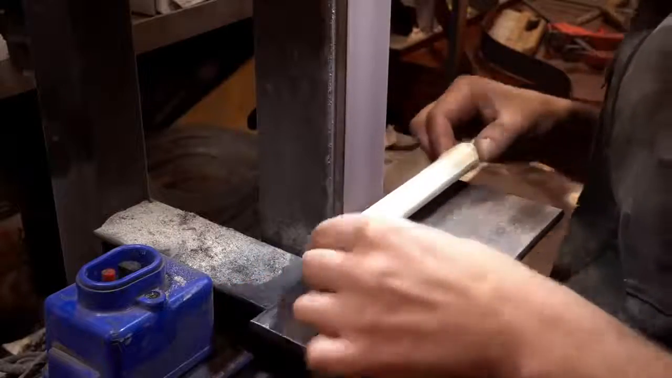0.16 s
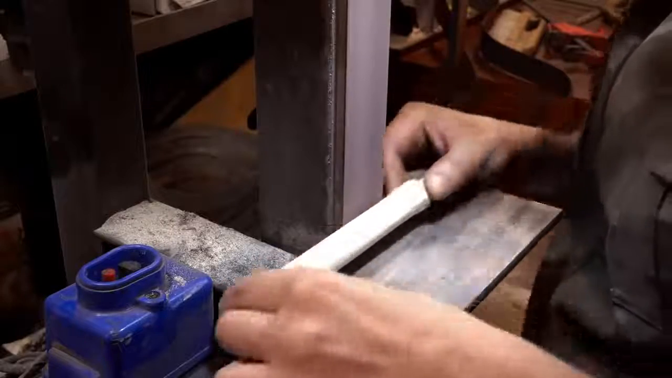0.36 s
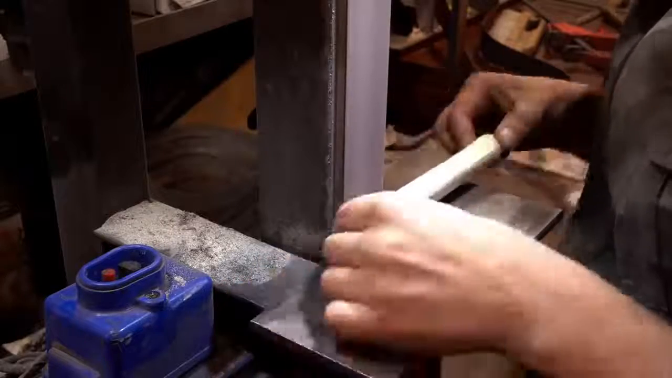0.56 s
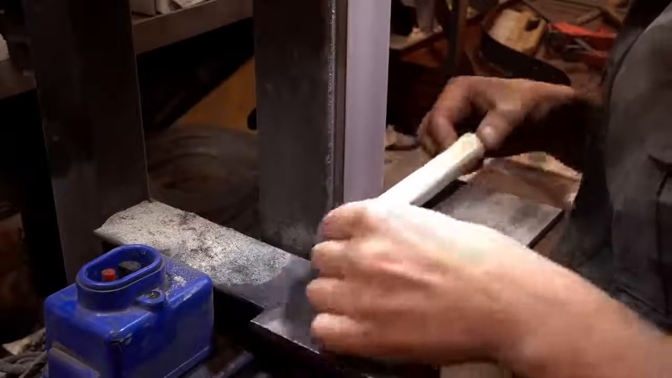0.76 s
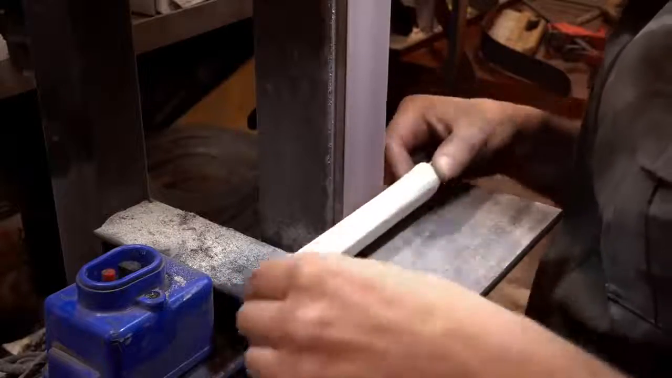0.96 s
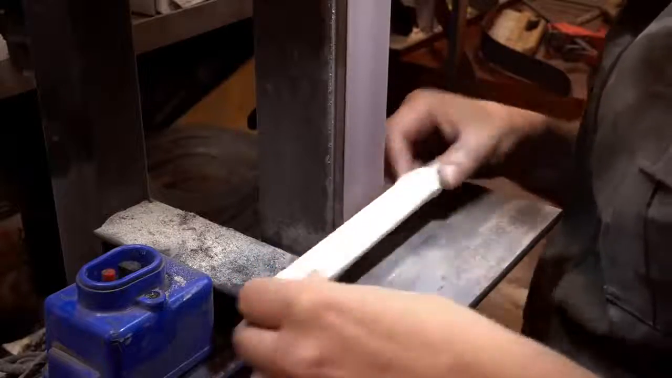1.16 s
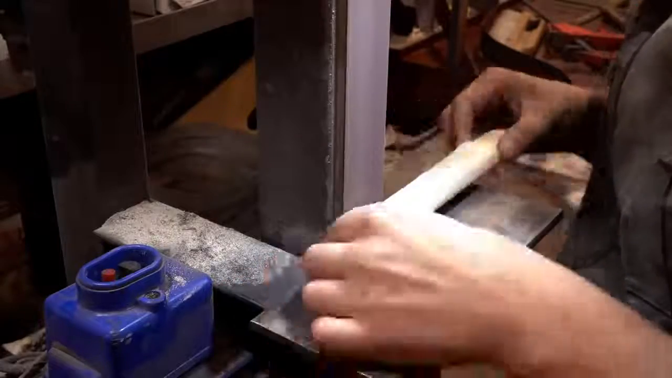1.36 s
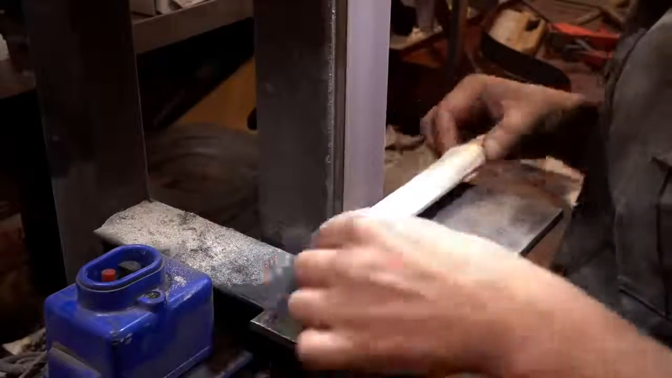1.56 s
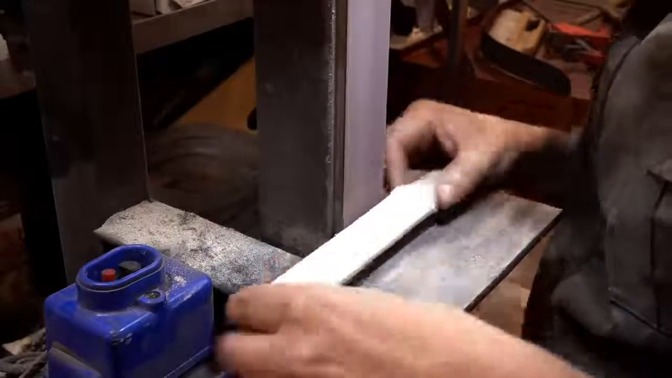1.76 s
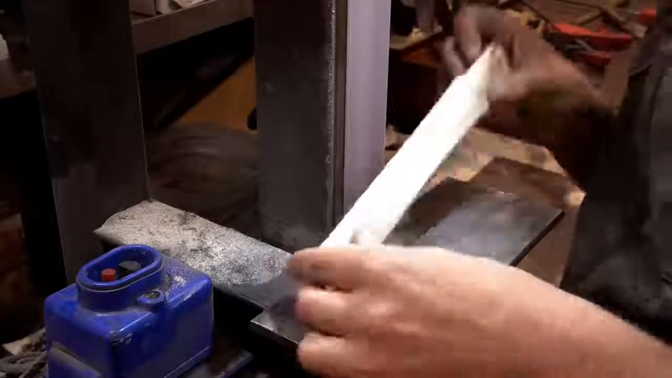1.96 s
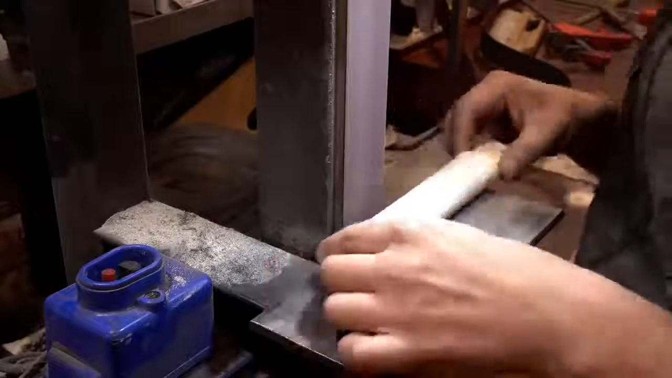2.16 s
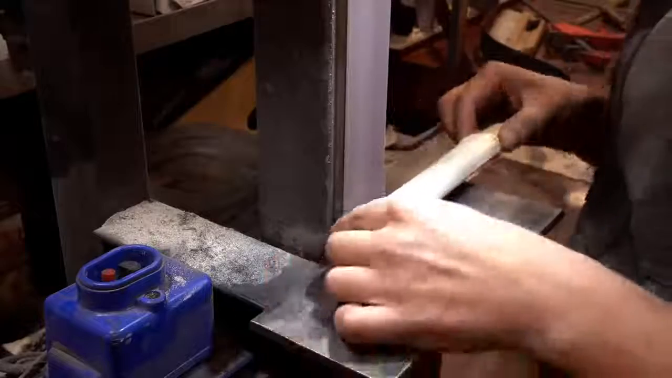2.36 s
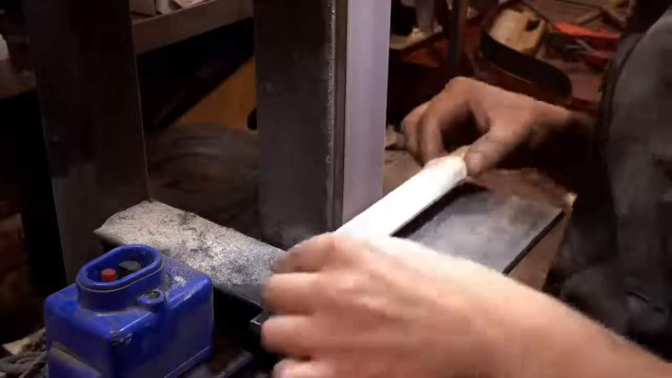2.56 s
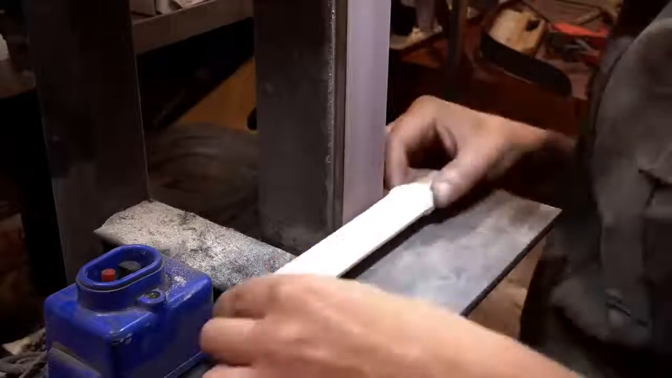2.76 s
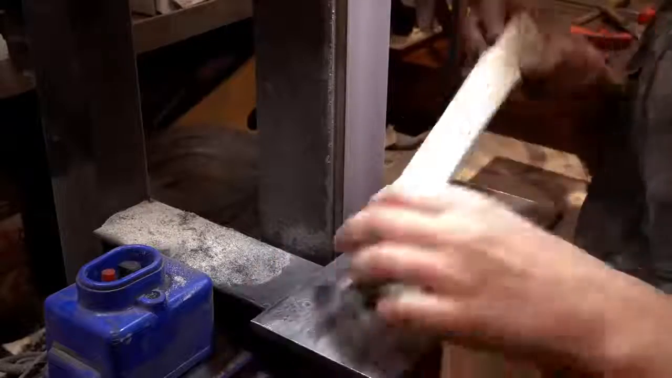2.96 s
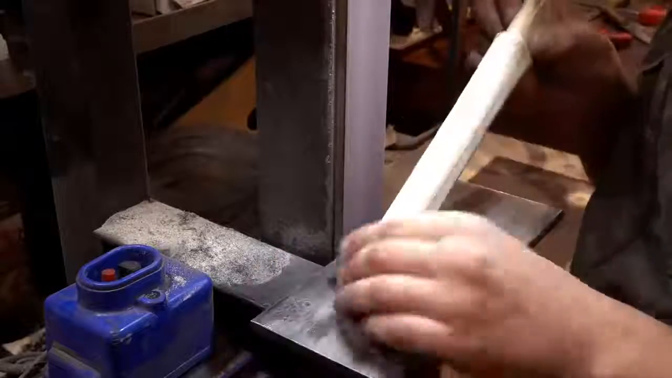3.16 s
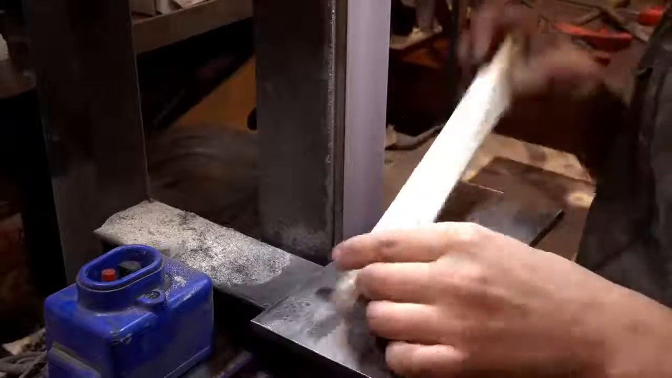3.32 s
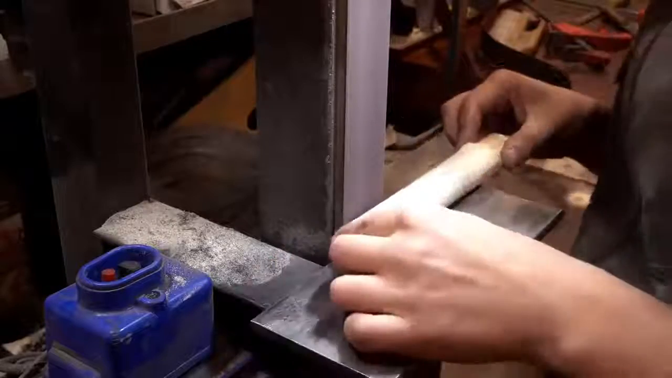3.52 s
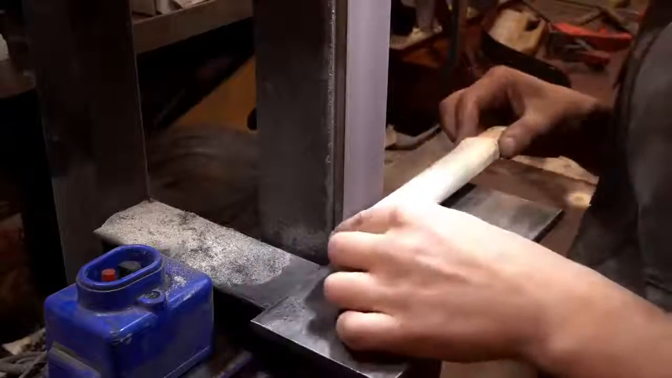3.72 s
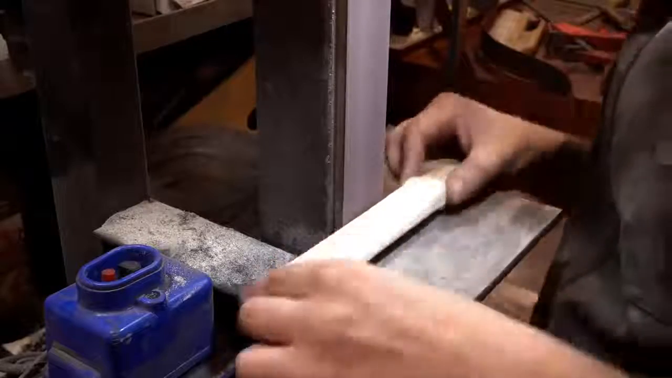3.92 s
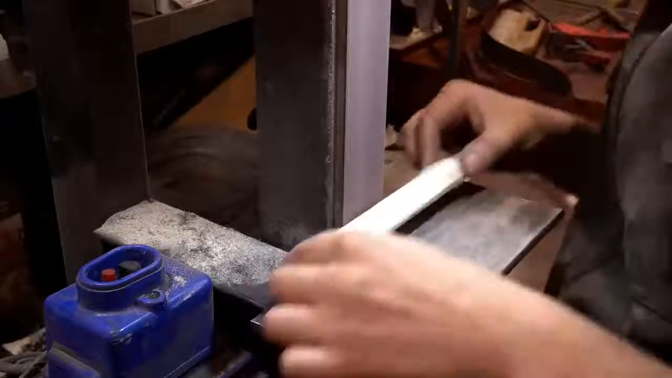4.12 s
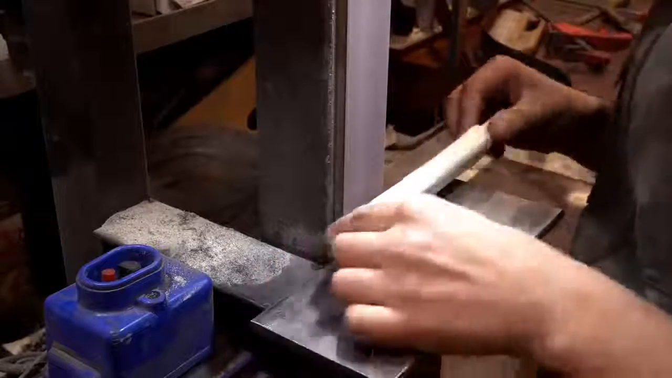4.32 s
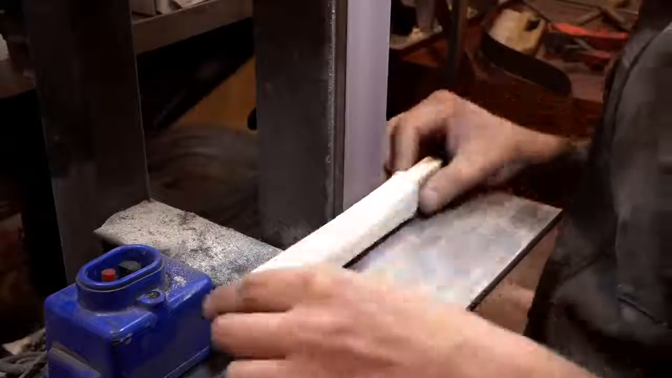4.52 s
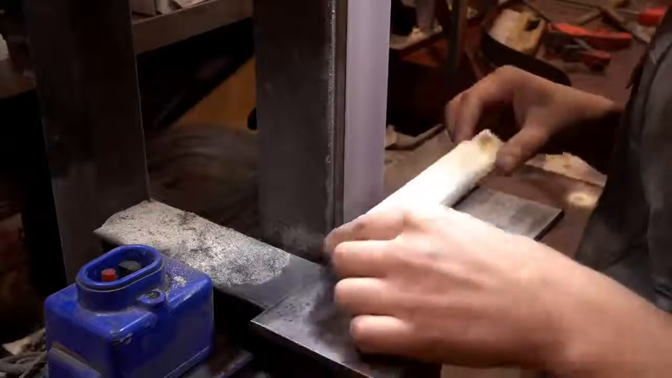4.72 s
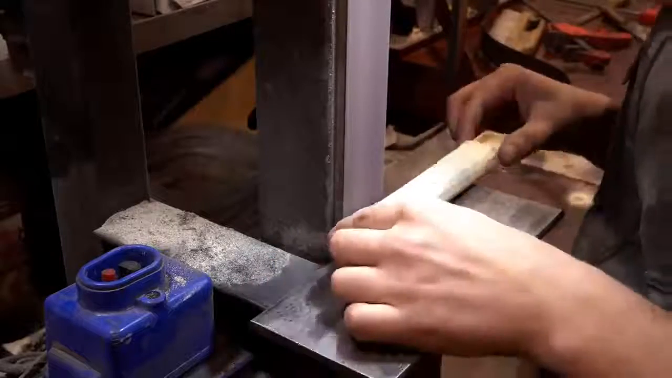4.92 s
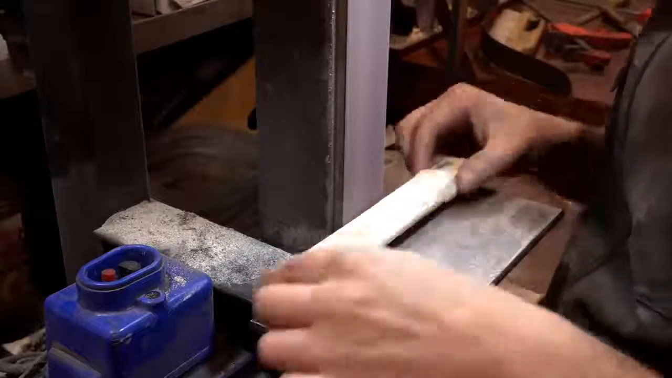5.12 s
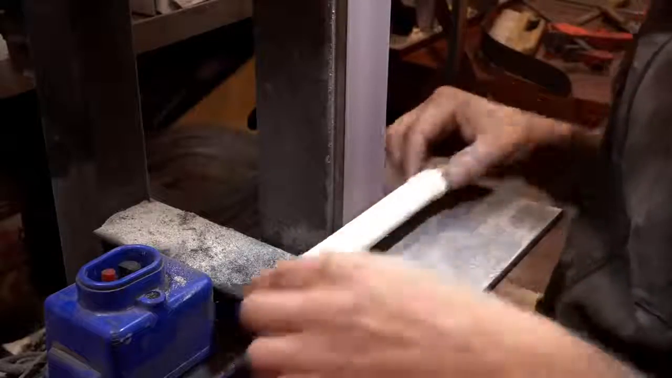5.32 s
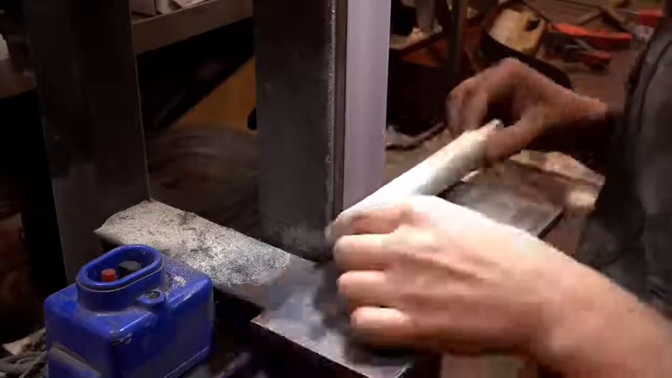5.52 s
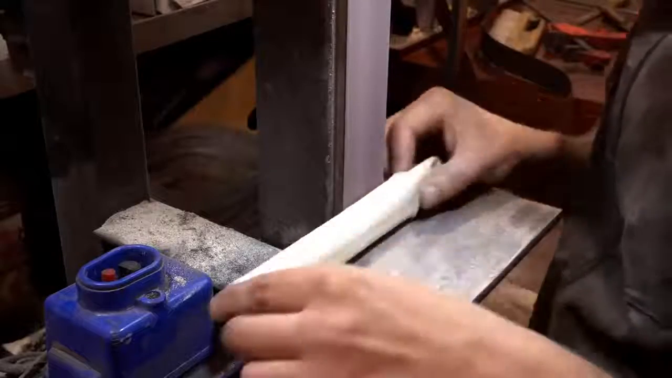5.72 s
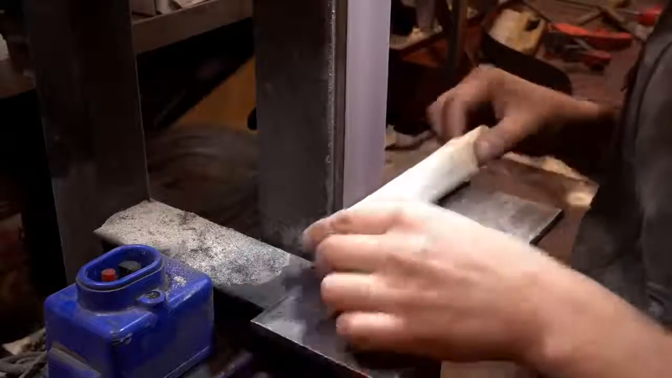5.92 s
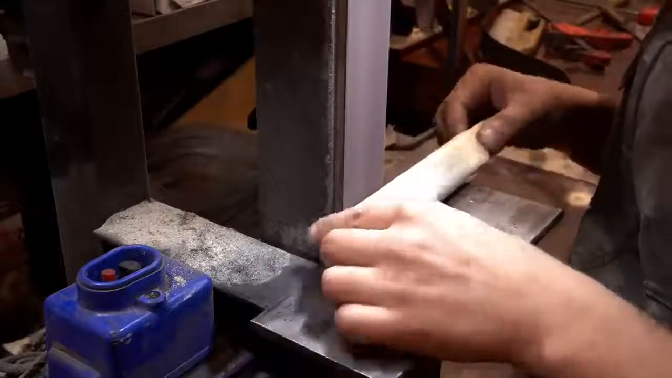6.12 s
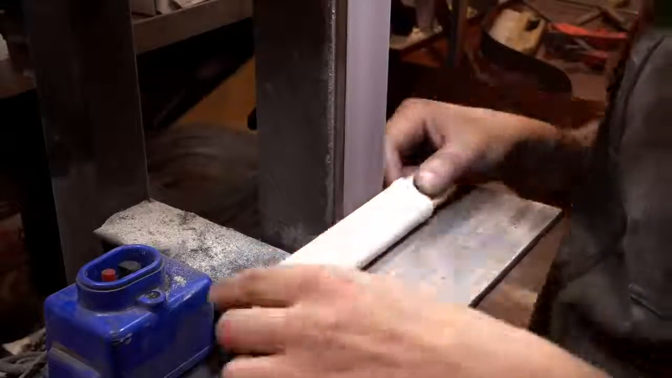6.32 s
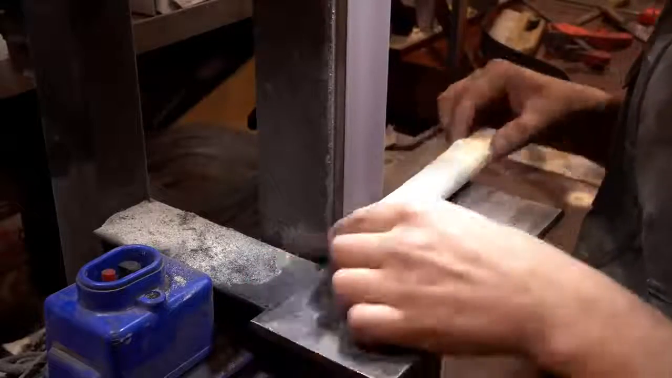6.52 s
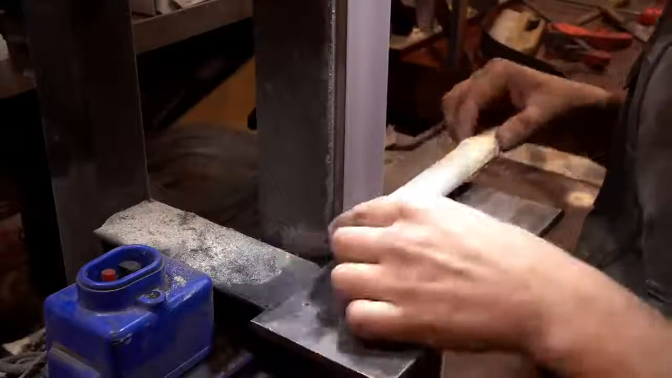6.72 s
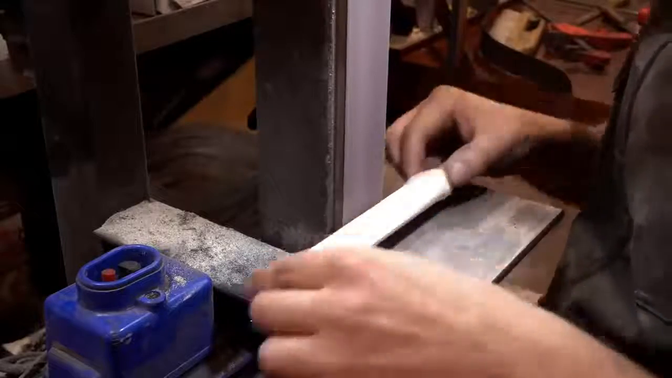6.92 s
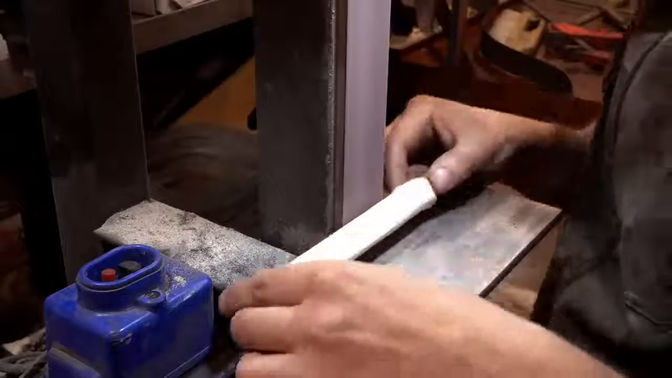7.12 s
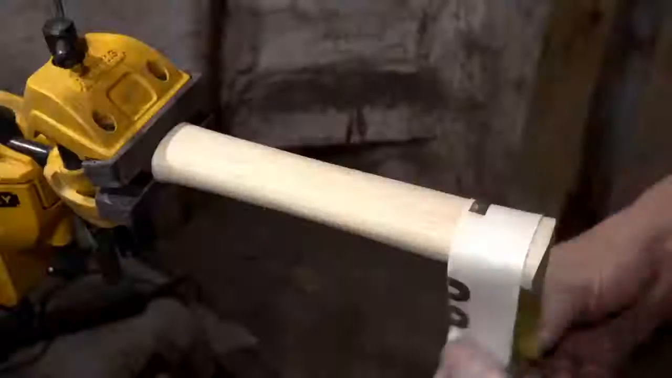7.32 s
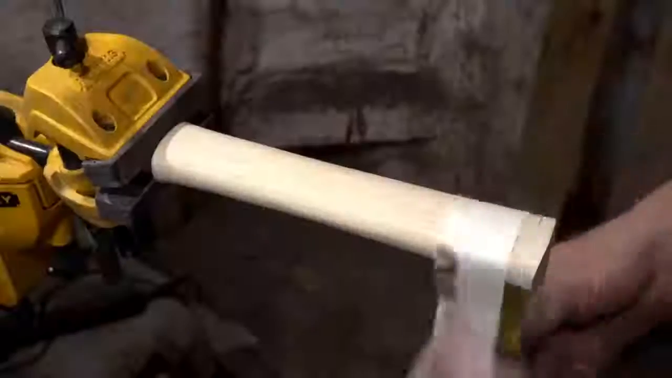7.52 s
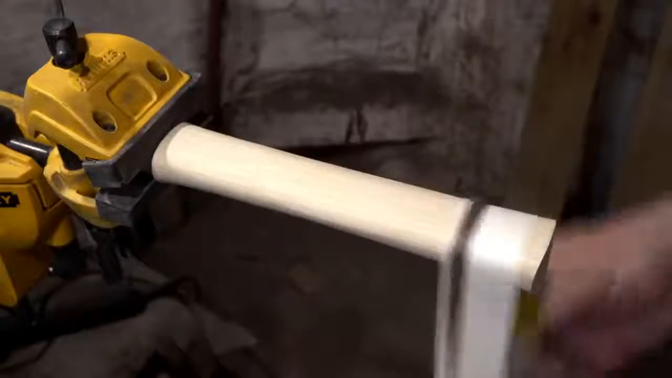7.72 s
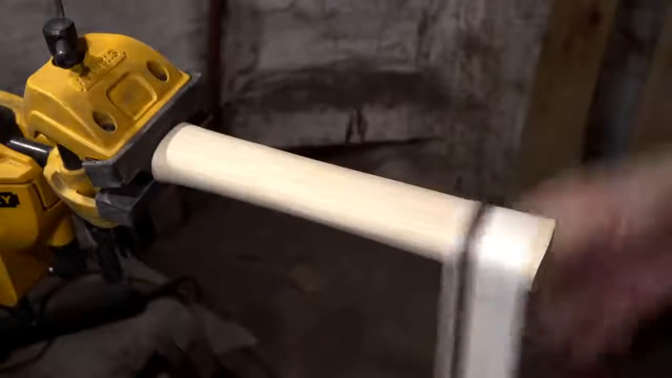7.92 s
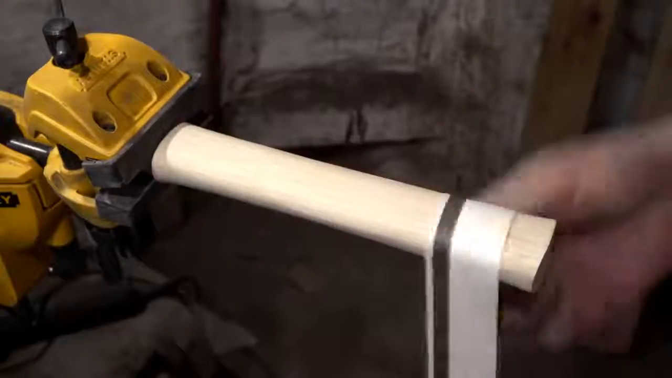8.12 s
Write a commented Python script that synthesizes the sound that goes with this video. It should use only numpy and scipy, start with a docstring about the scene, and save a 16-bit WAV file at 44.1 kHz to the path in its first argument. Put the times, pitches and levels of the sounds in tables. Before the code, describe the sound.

A belt grinder hums and rushes steadily while a wooden handle is sanded in hissing, ringing passes, then fast back-and-forth hand-sanding swishes take over.

```python
"""A workshop: a belt grinder idles while a wooden handle is pressed on the belt in short passes.
Shaped noise is the grit, hissing and ringing the steel plate behind the belt; over it lie the belt's rush
and three motor hums. Then a quick crossfade leads to hand sanding: a strip of sandpaper is pulled quickly
to and fro over the handle, one swish of noise a stroke, with faint low noise under the swishes."""
import sys
import numpy as np
from scipy import signal
from scipy.fft import rfft, irfft, next_fast_len
from scipy.io import wavfile
from scipy.ndimage import uniform_filter1d

SR = 44100
rng = np.random.default_rng(int(sys.argv[2]) if len(sys.argv) > 2 else 0)


def bounce(signal):
    """Save signal as a 16-bit WAV file at the path given by the first command-line argument."""
    frames = np.transpose(np.atleast_2d(signal))
    limited = np.clip(frames, -1, 1)
    pcm = np.round(limited * 32767).astype(np.int16)
    wavfile.write(sys.argv[1], SR, pcm)


N = 360723
FFT_N = next_fast_len(N)
T = np.arange(N) / SR  # time of each sample (s)
HZ = np.arange(FFT_N // 2 + 1) * SR / FFT_N  # frequency of each spectrum bin
CROSSFADE_S, FADE_S = 7.336, 0.0086  # moment of the crossfade; length of both fades


def sanding():
    """Grit tears wood and rings the plate; pressure and the face of the handle set each range of the hiss."""
    # handle on the belt, one list a pass from touch-down to lift-off:
    # (time [s], level of the grit hiss [dB], plate ring re hiss [dB], finest grit re hiss [dB])
    passes = [
        [(0.0, -55, -2, 5), (0.124, -57.5, 0.5, 2), (0.134, -59.5, -2, -2), (0.244, -51, -6.5, 3.5),
         (0.51, -53, -2, -1), (0.556, -59, -0.5, -3), (0.56, -74, 2, 4)],
        [(0.79, -57.5, -10, -1.5), (0.86, -48.5, -2.5, 0.67), (0.944, -51, -2, 0.59), (0.956, -53, -1, 1),
         (1.046, -52.5, -5, 1), (1.228, -55.5, -2.5, -1.7), (1.27, -61.5, -5, -1)],
        [(1.6, -59, -6, 3), (1.626, -50.5, -4, 4), (1.676, -52, 1.5, 1), (1.876, -55, 3.5, 1),
         (1.89, -62, -2, -4)],
        [(2.41, -61.5, -2, 7), (2.49, -57, 0.5, 3), (2.556, -52, -5, 2), (2.64, -54, 1, 4),
         (2.682, -50, -10, 0), (2.734, -53.5, -1, 4), (2.834, -55, 3, 2), (2.96, -55, 3, 4), (2.975, -65, 4, 9)],
        [(3.69, -68, -1, 8), (3.694, -58.5, -6, 1), (3.904, -50.5, -5.5, 3), (3.998, -54, 0, 3),
         (4.098, -54.5, -3, 6.5), (4.272, -50.5, -5, 1.5), (4.354, -61.5, 1.5, 3), (4.472, -50, -6, -1),
         (4.61, -53.5, -5, 0), (4.644, -48, -8, 0), (4.734, -49, -12, 0), (4.765, -58, -14, 2)],
        [(5.04, -63, -12, 4), (5.092, -51.5, -4, 4), (5.162, -51.5, -3, 4), (5.222, -52.5, -2.5, 2),
         (5.446, -51.5, 0, 3), (5.564, -60, -3, -1), (5.776, -49.5, -6, 3.5), (5.812, -54.5, -15, 4),
         (5.86, -50.5, -6, 0), (5.894, -46, -10, 0), (5.922, -51, -5.5, -1), (6.1, -54, -6.5, -1),
         (6.178, -55.5, -20, -1), (6.276, -52, -12, -2), (6.36, -51, -10, 3), (6.446, -50.5, -24, 4),
         (6.5, -57.5, -7, -1)],
        [(6.68, -64, -1, 4), (6.726, -52.5, -9, -3), (6.776, -57, -5, 0), (6.846, -51.5, 0, -2),
         (6.916, -52, -0.5, 1), (7.27, -54, 1.5, 3), (7.33, -56.5, 0, 2)],
    ]
    # low ranges of the sanding, in lists: (time [s], level of the wood rasp [dB], level of the lower plate ring [dB])
    lows = [
        [(0.0, -62, -64), (0.18, -66, -56.5), (0.28, -64, -66), (0.344, -62, -61), (0.452, -64.5, -62),
         (0.522, -62.5, -60), (0.55, -67, -63), (0.56, -75, -70)],
        [(0.79, -67, -58), (0.81, -82, -63), (0.816, -68, -60), (0.834, -68, -53), (1.048, -63, -61.5),
         (1.184, -62.5, -62.5), (1.23, -60.5, -60), (1.27, -67, -71)],
        [(1.6, -78, -63), (1.626, -65, -56), (1.638, -74, -57), (1.642, -67, -52), (1.736, -63.5, -60),
         (1.868, -64, -56.5), (1.89, -70, -65)],
        [(2.41, -70, -71), (2.496, -67, -54.5), (2.554, -66.5, -53.5), (2.734, -61.5, -57.5), (2.812, -70, -57),
         (2.864, -62.5, -59), (2.96, -69, -61), (2.97, -71, -74)],
        [(3.69, -70, -69), (3.718, -71, -59), (3.824, -66, -56.5), (4.298, -64.5, -58.5), (4.374, -71, -62),
         (4.44, -65.5, -55), (4.73, -65, -55.5), (4.76, -68, -66)],
        [(5.04, -71, -65), (5.068, -69, -58.5), (5.15, -63.5, -53.5), (5.356, -64, -58.5), (5.42, -63.5, -52),
         (5.606, -70, -64), (5.622, -73, -60), (5.7, -65, -61)],
        [(5.72, -64, -54.5), (5.786, -62, -59), (5.832, -68, -66), (5.902, -63.5, -52.5), (6.206, -68.5, -57.5),
         (6.262, -68, -54.5), (6.418, -63.5, -54.5), (6.5, -66, -64)],
        [(6.68, -77, -64), (6.696, -67, -59), (6.752, -68, -57), (6.956, -65, -54.5), (6.974, -64, -62),
         (6.996, -65.5, -55.5), (7.284, -65, -59), (7.325, -64, -62)],
    ]
    # colour of the sanding noise: (frequency [Hz], level [dB per Hz])
    colour = [(600, -50), (900, -29.5), (1500, -10.5), (1700, -14.5), (1850, -8), (2700, -9), (2900, -6),
              (3220, -5.5), (3650, -8.5), (4400, -7), (5200, -7), (6500, -3.5), (9000, -3), (12000, 0),
              (14500, 5.5), (15700, 1)]
    # steel plate and rest under the handle: (frequency [Hz], width [Hz], level over the sanding noise [dB])
    plate = [(1044, 25, 14), (1324, 25, 5), (1841, 20, 5), (2067, 20, 2), (2250, 20, 4), (2583, 20, 3),
             (2906, 18, 6), (2960, 22, 3), (3143, 25, 6), (3249, 30, 4), (3320, 30, 4), (3433, 22, 2),
             (3740, 22, 5), (3897, 18, 4), (4166, 22, 6), (4242, 18, 9), (4382, 20, 6), (4620, 60, -1),
             (4931, 20, 6), (4984, 20, 3), (5717, 30, -2), (6223, 25, 0), (6589, 25, 0), (7224, 25, 1)]
    # width of the sound field: (frequency [Hz], side minus mid [dB])
    width = [(1000, -78), (2400, -24), (4400, -7.5), (8000, -7), (15000, -7.5)]
    # broad tones that swell and fade as the handle is turned:
    # (middle [s], length [s], pitch [Hz], level over the sanding noise [dB])
    tones = [(0.268, .1, 5600, -12), (0.304, 0.1, 4700, -9), (.36, 0.1, 2050, -3), (.52, 0.087, 3400, -3),
             (.88, 0.13, 14900, -3), (0.907, 0.18, 4830, -9), (1.147, .16, 6740, -7),
             (1.23, 0.11, 7240, -3), (1.75, 0.29, 5760, -15), (2.542, 0.063, 6550, -4),
             (2.607, 0.17, 4100, -6), (2.843, 0.18, 5250, -10), (2.854, 0.13, 4220, -8),
             (3.95, 0.33, 4140, -4), (4.232, 0.27, 4330, -0.5), (4.2, 0.35, 2080, -9),
             (4.247, 0.11, 5640, -6), (4.493, .14, 4420, -4), (4.703, 0.089, 6500, -22),
             (5.154, .12, 7500, -8), (5.39, 0.27, 4300, -13), (5.74, 0.1, 9150, -1), (5.9, .08, 7500, -7),
             (5.964, 0.14, 8660, -5), (6.085, 0.19, 6600, 0), (6.085, 0.13, 7950, -2),
             (6.28, 0.072, 7900, -5), (6.283, 0.075, 6260, -4), (6.42, 0.15, 6500, -6),
             (6.45, 0.13, 14600, -8), (6.79, 0.13, 2680, -8), (6.95, 0.21, 4600, -9),
             (7.11, 0.33, 2250, -3)]
    lift_s = .04  # ramp before touch-down and after lift-off
    wheel_hz, wheel_db = 54.6, .6  # the wheel runs slightly out of round and throbs the pressure
    edges = [900, 2800, 3800, 5200, 10000, SR]  # Hz: rasp, lower ring, ring, hiss, finest grit

    touch = 0
    for rows in passes:
        down, up = rows[0][0], rows[-1][0]
        touch = touch + np.interp(T, [down - lift_s, down, up, up + lift_s], [0, 1, 1, 0])

    throb = np.sqrt(2) * np.sin(2 * np.pi * np.cumsum(wheel_hz + walk(3)) / SR)
    chatter = undb(0.52 * walk(25) + wheel_db * throb)  # the handle bounces lightly on the belt
    impacts = chatter * grit(2.0, width, lag_us=4)
    rung = ringing(impacts, plate, wander_db=2.5, rate=10)
    noise = filtered(rung, slope(colour) * dense_modes(2.2, 25, 5000))

    hiss_db, ring_db, fine_db = curve(np.vstack(passes))
    levels = curve(np.vstack(lows)) + [hiss_db + ring_db, hiss_db, hiss_db + fine_db]
    out = 0
    for lo, hi, db in zip(edges, edges[1:], levels):
        out = out + undb(db) * even(filtered(noise, band(lo, hi)))
    out = toned(touch * out, tones, q=15, sag=.04)
    return panned(out, -.9 + 0.26 * walk(7.3)) + squeak()


def squeak():
    """An edge catches and squeaks: a short rising whistle."""
    # (start [s], length [s], from [Hz], to [Hz], peak level [dB])
    start, length, from_hz, to_hz, db = (2.483, .013, 2500, 3350, -51)
    u = np.clip((T - start) / length, 0, 1)
    whistle = np.sin(2 * np.pi * np.cumsum(from_hz + (to_hz - from_hz) * u) / SR)
    return undb(db) * np.sin(np.pi * u) * whistle


def strip():
    """Each pull swells with the speed of the paper and sinks at the turn; faster is brighter."""
    # hand strokes; the strip slows at each turn but does not stop:
    # (start [s], peak level [dB], dip at the turn before it [dB])
    strokes = [(7.336, -48, -7), (7.369, -42, -10), (7.421, -45.5, -15), (7.468, -42.5, -9),
               (7.518, -44, -10), (7.564, -39, -10), (7.617, -44, -9), (7.663, -40.5, -9),
               (7.715, -46, -10.5), (7.755, -41.5, -6.5), (7.805, -44.5, -12), (7.846, -41, -7.5),
               (7.894, -44.5, -11.5), (7.936, -40, -8.5), (7.984, -43.5, -10.5), (8.033, -39, -9.5),
               (8.085, -43, -10), (8.130, -38, -10.5), (8.182, -45, -13)]
    # the two hands take turns: (moment of top speed [share of the stroke], left minus right [dB])
    hands = [(0.58, -2), (0.43, -2)]
    # colour of the swish: (frequency [Hz], level [dB per Hz])
    colour = [(1150, -61), (1340, -19.5), (1570, -51.5), (1730, -13.5), (1970, -19), (2720, -9.5),
              (3500, -10.5), (4600, -3.5), (7000, -5), (10500, -1), (12000, -3), (14500, -6), (15700, -5.5)]
    # broad tones of paper and handle, changing from pull to pull:
    # (frequency [Hz], width [Hz], level over the swish [dB])
    paper = [(4560, 300, -9), (6600, 1600, -1), (7500, 660, -10.5), (8850, 900, -6.5), (14100, 1200, -4)]
    # width of the sound field: (frequency [Hz], side minus mid [dB])
    width = [(1300, -10), (4400, -13), (8000, -6), (15000, -4)]

    start, peak_db, turn_db = np.transpose(strokes)
    top, pan_db = np.resize(hands, (len(start), 2)).T
    tops = start[:-1] + np.clip(top[:-1], .1, .9) * np.diff(start)
    knots = np.sort(np.r_[start, tops])  # turns and top speeds alternate
    speed = np.sin(np.pi / 2 * np.interp(T, knots, np.arange(len(knots)))) ** 2
    dip_db = np.interp(T, start, turn_db) * (1 - speed) ** 1.9
    db = np.interp(T, tops, peak_db[:-1]) + dip_db

    rung = ringing(grit(1.3, width, lag_us=13), paper, wander_db=2.5, rate=20)
    noise = unit(filtered(rung, slope(colour)))
    dull = filtered(noise, band(1, 3200, order=2))
    dull_db = -43.5 + 0.17 * (db + 50.5)  # the dull part follows the speed far less
    swish = undb(db) * (noise - dull) + undb(dull_db) * dull
    return panned(swish, np.interp(T, tops, pan_db[:-1])) + low_noise(db)


def low_noise(swish_db):
    """Faint low noise under the swishes, following their level weakly."""
    # colour of the low noise: (frequency [Hz], level [dB per Hz])
    colour = [(30, -21), (60, -8.5), (250, 7.5), (330, -9), (400, -20)]
    noise = grit(0, [(100, -11), (400, -11)])
    low = unit(filtered(noise, slope(colour) * (HZ < 420)))
    return low * undb(-84.5 + 3.5 * walk(18) + 0.36 * (swish_db + 44))


def machine():
    """The idling grinder: belt rush and frame buzz as noise, motor hum as sines."""
    beat, trough = low_hum_beat()
    return belt_rush() + frame_buzz(beat) + motor_hum(beat, trough)


def belt_rush():
    """The belt rushes over plate and wheels and rings the frame."""
    # colour of the running noise: (frequency [Hz], level [dB per Hz])
    colour = [(15, -75), (30, -39), (70, -26.5), (150, -15.5), (370, -27), (600, -26), (1500, -27.5),
              (2750, -19), (3100, -18), (4700, -14.5), (6300, -17), (10000, -17), (13500, -18),
              (14400, -18), (15700, -23)]
    # frame, wheels and bearings: (frequency [Hz], width [Hz], level over the running noise [dB])
    frame = [(255, 20, 3), (310, 40, 2), (455, 40, 4), (810, 20, -2), (995, 15, 1), (2002, 12, 7),
             (2487, 5, 14), (3014, 15, 7), (3617, 12, 5), (3768, 15, 5), (4575, 20, 5), (4640, 20, 6),
             (4704, 20, 3), (5232, 20, 3), (5466, 25, 3), (5560, 30, 6), (5724, 25, 3), (6750, 500, 0),
             (8074, 30, 2), (10200, 400, -4)]
    # width of the sound field: (frequency [Hz], side minus mid [dB])
    width = [(30, -20), (200, -30), (500, -15), (1300, -14), (4400, -6), (15000, -3)]
    rung = ringing(grit(0.82, width, lag_us=-6), frame, wander_db=2.0, rate=4.12)
    rush = filtered(rung, slope(colour) * dense_modes(2.3, 25, 5300))
    # the level counts what lies above 400 Hz on the left, before the lean
    rush *= undb(-51.5 + 0.16 * walk(12)) / np.std(filtered(rush[0], band(400, SR)))
    belt = filtered(rush, band(4800, SR, order=2))
    return rush + panned(belt, 2.5) - belt  # the belt's treble leans left


def low_hum_beat():
    """The low hum beats unevenly: a swell between dips, and the depth it sinks to."""
    # its dips: (time [s], depth [dB])
    dips = [(0.0, -11), (0.26, -13), (0.45, -8), (0.8, -16), (1.07, -10), (1.36, -13), (1.75, -12),
            (2.13, -10), (2.59, -15), (2.82, -15), (3.1, -14), (3.59, -10), (3.92, -12), (4.2, -7),
            (4.57, -12), (4.96, -13), (5.32, -7), (5.71, -15), (6.0, -9), (6.41, -9), (6.82, -11),
            (7.08, -12), (7.4, -11)]
    dip_s, dip_db = np.transpose(dips)
    beat = np.abs(np.sin(np.pi * np.interp(T, dip_s, np.arange(len(dips)))))
    return beat, undb(np.interp(T, dip_s, dip_db))


def frame_buzz(beat):
    """A narrow band of noise, the frame buzz, swells where the low hum dips."""
    buzz_hz, width_hz = 307.6, 22
    gain = band(buzz_hz - width_hz / 2, buzz_hz + width_hz / 2, order=30)
    buzz = unit(filtered(rng.standard_normal(N), gain))
    return undb(-76) * buzz * (1 - beat ** 2) ** 1.9


def motor_hum(beat, trough):
    """The motor hums on three tones: one steady in pitch, a beating low one and a wavering drone."""
    # (time [s], level of the steady hum [dB])
    hum_levels = [(0.05, -60.5), (0.35, -58.5), (0.63, -62), (1.08, -58.5), (1.28, -61), (2.47, -61),
                  (2.69, -57.5), (2.92, -60), (3.76, -60.5), (3.93, -59), (4.27, -61), (6.65, -62),
                  (6.87, -60), (7.3, -61.5)]
    hum_hz, low_hz, drone_hz = 148.9, 98.8, 200.5
    low_db, drone_db = -67, -73
    hum = undb(curve(hum_levels)[0] + 0.84 * walk(9)) * np.sin(2 * np.pi * hum_hz * T)
    low_tone = np.sin(2 * np.pi * np.cumsum(low_hz + 1.01 * walk(2.9)) / SR)
    low = undb(low_db) * np.hypot(beat ** 0.76, trough) * low_tone
    drone_tone = np.sin(2 * np.pi * np.cumsum(drone_hz + 3.04 * walk(16)) / SR)
    drone = undb(drone_db + 2.3 * walk(23)) * drone_tone
    return np.sqrt(2) * panned(hum + low + drone, 0.025 * walk(4.36))  # root 2: levels are rms


def grit(scatter_db, wide, lag_us=0):
    """Dense grain impacts of uneven size in stereo, side set by frequency; left lags right by lag_us."""
    sizes = np.minimum(rng.exponential(size=N), 4)
    mid, side = rfft(rng.standard_normal((2, N)) * undb(scatter_db * sizes), FFT_N)
    hz, db = np.transpose(wide)
    side = side * undb(np.interp(np.log(HZ + 1), np.log(hz), db))
    late = np.exp(-1j * np.pi * np.outer([1, -1], HZ) * lag_us * 1e-6)  # half the lag on each channel
    return unit(irfft(np.array([mid + side, mid - side]) * late, FFT_N)[:, :N])


def ringing(x, modes, wander_db, rate):
    """The drive plus each mode it rings; a mode swells and fades as the contact shifts."""
    out = x.copy()
    for hz, width, db in modes:
        b, a = signal.iirpeak(hz, hz / width, fs=SR)
        out += undb(db + wander_db * walk(rate)) * signal.lfilter(b, a, x)
    return out


def dense_modes(depth_db, width_hz, from_hz):
    """Too many steel modes to count ripple the treble: a smoothed random gain over frequency."""
    k = int(width_hz / HZ[1])
    ripple = uniform_filter1d(uniform_filter1d(rng.standard_normal(len(HZ)), k), k)
    return undb(depth_db * unit(ripple) * band(from_hz, SR, order=2))


def toned(x, swells, q, sag):
    """Each swell lifts one tone out of the noise, sliding down by about the share sag."""
    out = x.copy()
    for mid, length, hz, db in swells:
        first = max(int((mid - length / 2) * SR) + 1, 0)
        part = slice(first, int((mid + length / 2) * SR))
        u = np.clip((T[part] - mid) / length + .5, 0, 1)
        # crossfade from a higher resonance to a lower one
        for shift, weight in ((1, 1 - u), (-1.2, u)):
            b, a = signal.iirpeak(hz * (1 + shift * sag / 2), q, fs=SR)
            swell = undb(db) * np.sin(np.pi * u) * np.sqrt(2 * weight)
            out[:, part] += swell * signal.lfilter(b, a, x[:, part])
    return out


def even(x):
    """Rms about 1 over every fifth of a second: ringing shifts between modes, the range keeps its level."""
    k = SR // 10
    power = uniform_filter1d(uniform_filter1d(np.mean(x ** 2, axis=0), k), k)
    return x / np.sqrt(power)


def walk(rate):
    """Random levels joined smoothly, about rate of them a second; spread 1."""
    steps = np.repeat(rng.standard_normal(int(T[-1] * rate) + 2), 8)
    w = uniform_filter1d(uniform_filter1d(steps, 8), 8)
    return np.interp(T * rate * 8, np.arange(len(w)), unit(w - w.mean()))


def curve(table):
    """Columns of a time table, one value a sample."""
    s, *columns = np.transpose(table)
    return [np.interp(T, s, c) for c in columns]


def slope(points):
    """Gain at each frequency from (Hz, dB) points; nothing below the first, the last held above."""
    hz, db = np.transpose(points)
    return undb(np.interp(np.log(HZ + 1), np.log(hz), db, left=-200, right=db[-1]))


def band(lo_hz, hi_hz, order=10):
    """Gain of a band-pass, steeper with order."""
    low_cut = 1 + (lo_hz / (HZ + 1)) ** (2 * order)
    high_cut = 1 + (HZ / hi_hz) ** (2 * order)
    return 1 / np.sqrt(low_cut * high_cut)


def filtered(x, gain):
    """Weight the spectrum of x."""
    return irfft(rfft(x, FFT_N) * gain, FFT_N)[..., :N]


def panned(x, pan_db):
    """Lean a sound to one side by left minus right dB."""
    return x * undb(np.outer([1, -1], pan_db) / 2)


def undb(db):
    """Decibels to gain."""
    return 10 ** (np.asarray(db) / 20)


def unit(x):
    """Rms 1."""
    return x / np.sqrt(np.mean(x ** 2))


def scene():
    """The grinder fades out in a few milliseconds while the hand sanding fades in."""
    # single steel modes that sing out for a moment: (middle [s], length [s], pitch [Hz], level over the noise [dB])
    sings = [(.27, .55, 1050, -1), (.9, 0.26, 4242, -1), (1, .2, 3739, 0), (1.19, 0.2, 3290, 5),
             (3.635, .1, 808, 11.5), (4.01, 0.12, 4940, -1), (4.916, 0.15, 812, 13),
             (7.224, 0.29, 3260, -3)]
    fade_out = np.clip((CROSSFADE_S + 0.0022 - T) / FADE_S, 0, 1)
    fade_in = np.clip((T - CROSSFADE_S + 0.0024) / FADE_S, 0, 1)
    idle = machine()
    grinder = toned(idle + sanding(), sings, q=130, sag=0)
    # a quiet middle band of the idle noise fades out under the first stroke, 400 dB a second
    idle_tail = filtered(idle, band(350, 1700)) * undb(-8 - 400 * np.maximum(T - CROSSFADE_S, 0))
    return fade_out * grinder + fade_in * (strip() + idle_tail)


def record(dry):
    """A steep low-pass takes off the top above 15.77 kHz."""
    return signal.sosfilt(signal.ellip(16, .5, 70, 15770, fs=SR, output="sos"), dry)


dry = scene()
out = record(dry)
bounce(out)
```